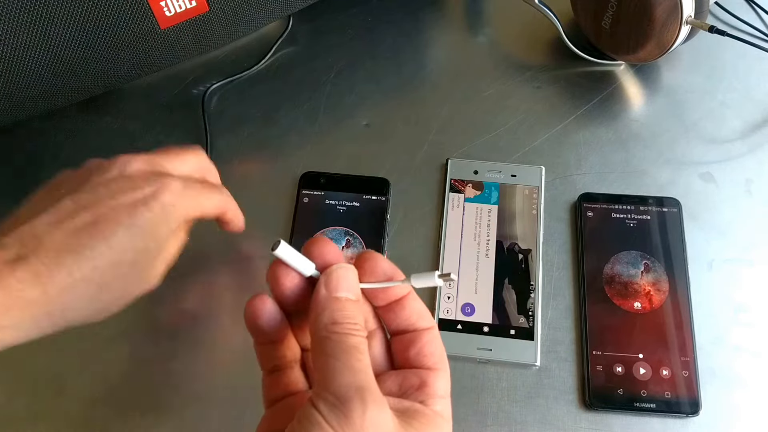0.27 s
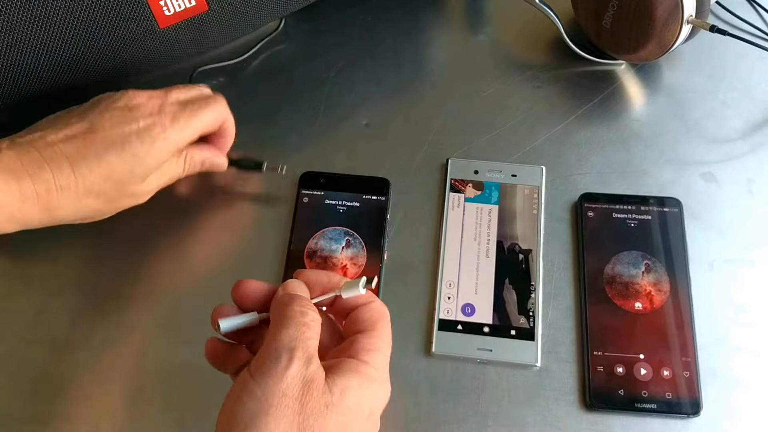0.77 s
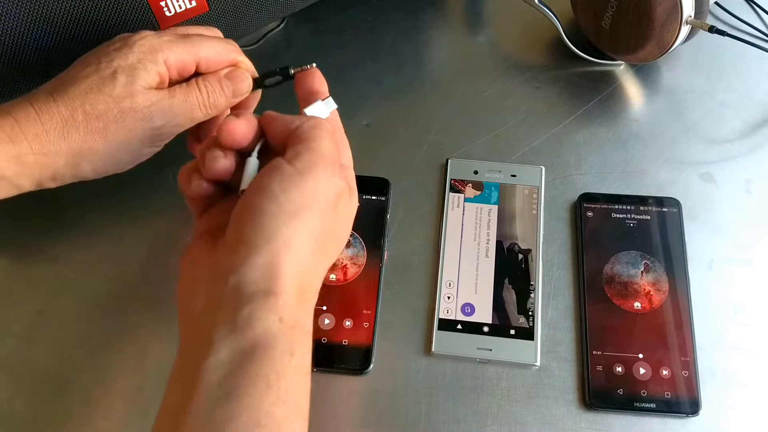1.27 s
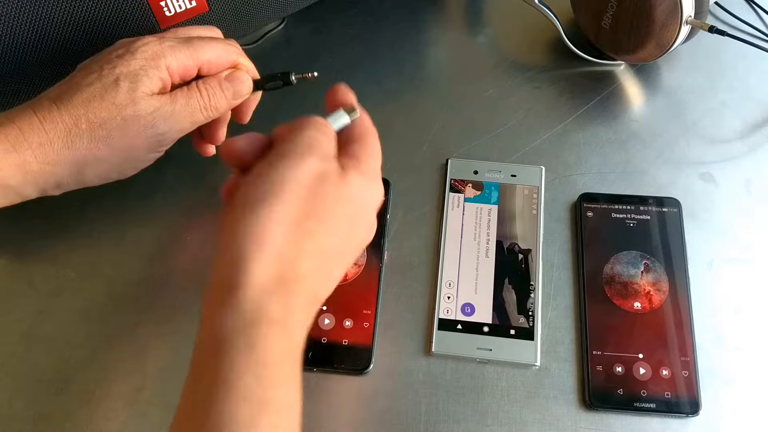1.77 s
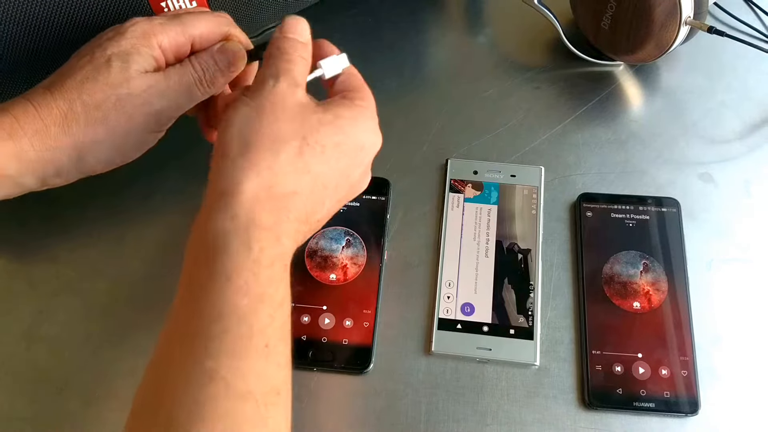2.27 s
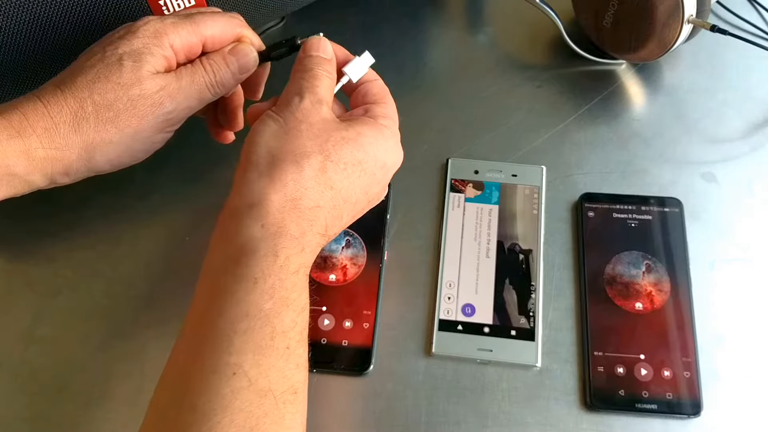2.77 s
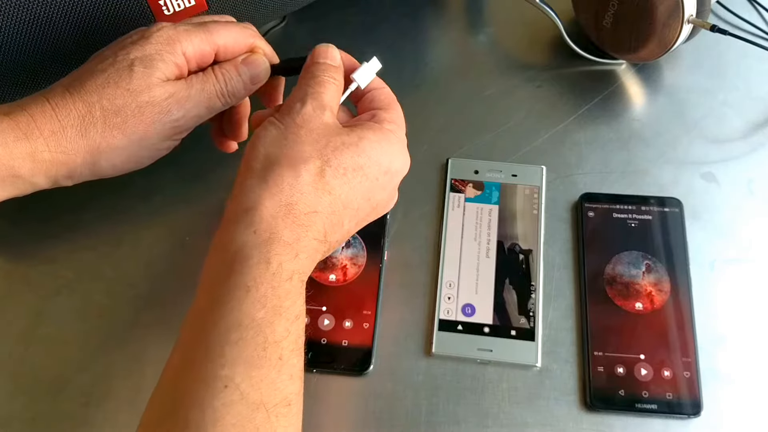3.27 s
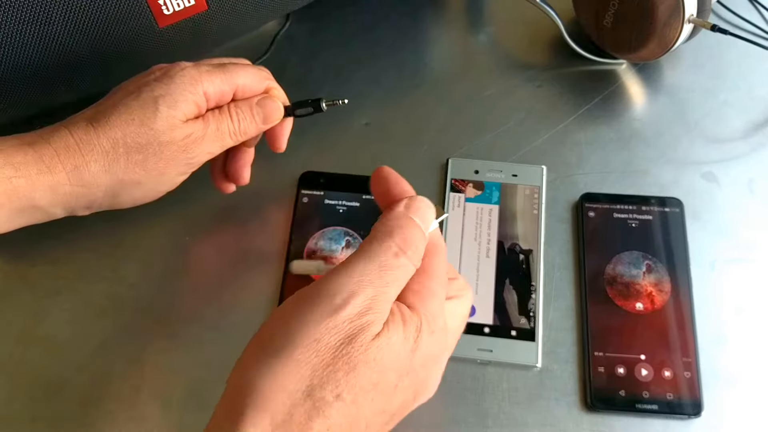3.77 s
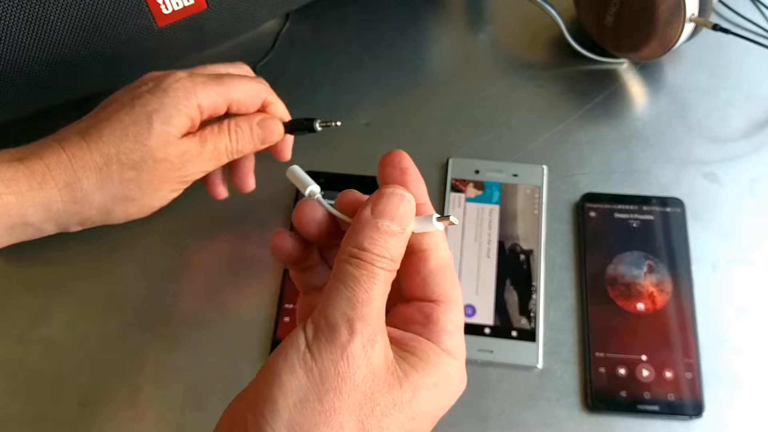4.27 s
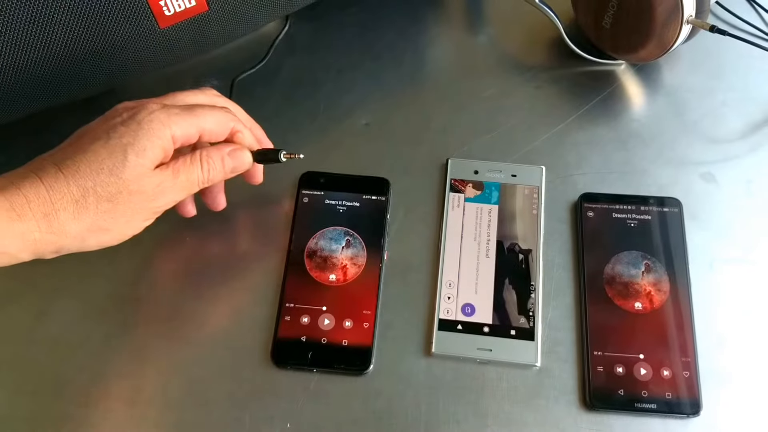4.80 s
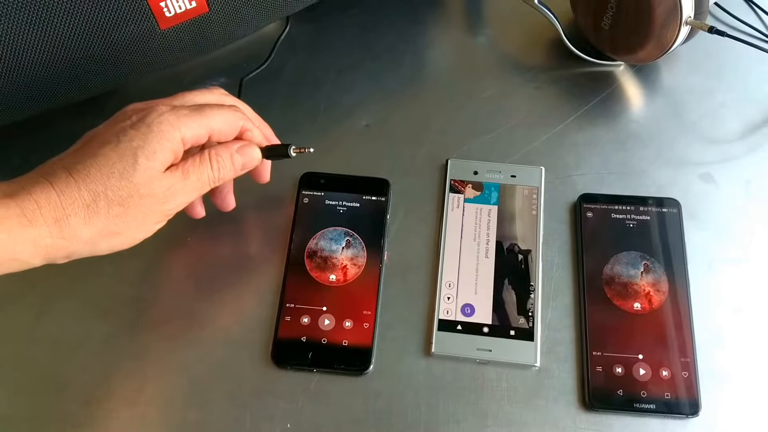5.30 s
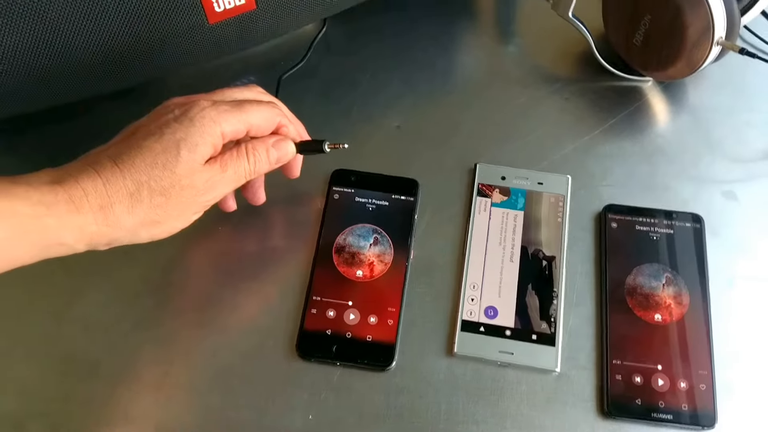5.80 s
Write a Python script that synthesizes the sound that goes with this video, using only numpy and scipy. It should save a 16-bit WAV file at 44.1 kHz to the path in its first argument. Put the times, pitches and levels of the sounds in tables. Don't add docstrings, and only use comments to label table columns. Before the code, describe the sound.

After a sharp unplugging snap and small table taps, five brief touches make a big speaker spit crackling mains buzz in a quiet room.

```python
import sys
import numpy as np
from scipy import signal
from scipy.fft import rfft, irfft
from scipy.io import wavfile

SR = 44100
rng = np.random.default_rng(int(sys.argv[2]) if len(sys.argv) > 2 else 0)


def invert_db(x):
    u = np.asarray(x, float) / 20
    return 10 ** u


def wav_out(sig):
    wavfile.write(sys.argv[1], SR, np.round(np.clip(np.atleast_2d(sig).T, -1, 1) * 32767).astype(np.int16))


N = 266540


def evened(x):
    return x / np.sqrt(np.mean(x ** 2) + 1e-20)


def read(points, hz, axis=1):
    table = np.transpose(points)
    return np.interp(np.log(hz + 1), np.log(table[0] + 1), table[axis])


def add(mix, s, sound):
    part = mix[..., round(s * SR):][..., :sound.shape[-1]]
    part += sound[..., :part.shape[-1]]


def resonate(x, hz, width):
    turn = np.exp(2j * np.pi * np.cumsum(hz * np.ones(len(x))) / SR)
    r = np.exp(-np.pi * width / SR)
    return 2 * (turn * signal.lfilter([1 - r], [1, -r], x / turn)).real


def resonate_twice(x, hz, width):
    return resonate(resonate(x, hz, width), hz, width)


def panned(x, pan_db):
    return x * invert_db([[pan_db / 2], [-pan_db / 2]])


def causal(points):
    gain = np.log(invert_db(read(points, abs(np.fft.fftfreq(4096, 1 / SR)))))
    taps = np.fft.ifft(np.exp(signal.hilbert(gain).conj())).real[:1500]
    return taps / np.linalg.norm(taps)


# (frequency [Hz], level per Hz [dB])
FLOOR_COLOUR = [(30, -37), (45, -9.5), (62, -1.5), (85, -13.5), (240, -18.5), (450, -25), (1200, -32),
                (2200, -38), (3800, -42), (7000, -46.5), (9000, -43), (12500, -38), (15300, -41.5),
                (16500, -63.5)]


def floor():
    floor_db = -56.5
    swell_s, swell_db = (.9, 3.4), (-2, 2.6)
    rest_s, rustle_db = (.5, .95), (7.1, .5)
    frames, hz = N // 512 + 5, np.fft.rfftfreq(2048, 1 / SR)
    a, b, c, d = rng.standard_normal((frames, 1025, 4)).T
    left, other = a + 1j * b, c + 1j * d
    same = np.clip(read(PORTS, hz, axis=3), 0, 1)[:, None]
    right = same * left + np.sqrt(1 - same ** 2) * other
    z = np.array([left, right]) * invert_db(read(FLOOR_COLOUR, hz))[:, None]
    t = np.arange(frames) * 512 / SR
    rumble = np.outer(hz < 260, np.interp(t, swell_s, swell_db))
    rustle_band = 1 / (1 + (110 / (hz + 1)) ** 4) / (1 + (hz / 1900) ** 4)
    z *= invert_db(rumble + np.outer(rustle_band, np.interp(t, rest_s, rustle_db)))
    noise = signal.istft(z, nperseg=2048, noverlap=1536)[1][:, :N]
    return invert_db(floor_db) * evened(noise)


# (time [s], level [dB])
SLIDE = [
    (0.0, -50),
    (0.058, -46),
    (0.062, -60),
]


def slide():
    out, (at, slide_db) = np.zeros((2, N)), np.transpose(SLIDE)
    t = np.arange(0, SNAP[0] + .001, 1 / SR)
    noise = np.diff(rng.standard_normal((2, len(t) + 1)))
    rub = np.array([resonate(n, 3900, 5800) for n in noise])
    add(out, 0, evened(rub) * invert_db(np.interp(t, at, slide_db) - 2.0))
    return out


# (time [s], peak level [dB], length [s])
SNAP = [(0.063, -3.5, 0.004)][0]
# (frequency [Hz], level per Hz [dB])
SNAP_COLOUR = [(47, -41), (80, -7.5), (346, -6.5), (2080, -20.5), (2840, -22.5), (3320, -27.5),
               (3620, -22.5), (4230, -26), (4940, -25), (11700, -23.5), (16000, -34.5)]


def snap():
    out, far, (s, db, length), colour = np.zeros((2, N)), np.zeros(N), SNAP, causal(SNAP_COLOUR)
    s = s + .001
    t = np.arange(600) / SR
    fall_db = -np.maximum(t - length, 0) * 11000 - 6.6 * (t > length)
    flutter = 0.71 + np.sin(np.pi * t / .0025) ** 2
    rattle = rng.standard_normal((2, 600)) * invert_db(fall_db) * flutter
    rattle = signal.fftconvolve(np.diff(rattle), colour[None], axes=1)
    rattle = rattle + 13.5 * np.array([resonate(n, 1280, 1140) for n in rattle])
    push = -np.sin(2 * np.pi * np.clip((t - .0006) / 0.00292, 0, 1)) * np.exp(-t / 0.0061)
    add(out, s, invert_db(db - 6.0) * panned(rattle / abs(rattle).max(), 2.9))
    add(out, s, invert_db(db - 8.5) * push)
    add(far, s, invert_db(db + 0.5) * (colour + 0.43 * resonate(colour, 240, 420)))
    return out, far


# (time [s], peak level [dB], centre [Hz], left-right [dB], time to fall by 60 dB [s])
KNOCKS = [
    (0.401, -37.5, 166, -1, 0.084),
    (0.648, -45.5, 328, 1, 0.029),
    (1.537, -60, 356, -4, 0.041),
    (4.959, -48, 129, -9, 0.17),
]
# (time [s], peak level [dB], left-right [dB])
CABLE = [(6650, 17000, 2, 0.02, 1)], [(.4015, -41.5, 9), (.4144, -43, -1)]
PLUG_TIP = [(1300, 1230, 1, 0.03, 0), (3000, 3000, -7.5, .012, 0)], [(.584, -56, -2), (.607, -40.5, 7)]
ADAPTER = ([(3800, 1900, -5, .014, -18), (1460, 1970, -6.5, 0.032, 6), (7370, 1300, -13.5, .012, 19),
           (2960, 760, -12.5, 0.027, -10)], [(4.9801, -31.5, 0.5), (4.9995, -34, -3), (5.0045, -37, 0)])
SHELL = [(4330, 1700, -1.5, 0.018, 0), (2890, 1100, -4.5, .012, -3)], [(5.1741, -40, -7)]
FINGERS = ([(960, 1300, -0.5, 0.028, 6), (2240, 1400, -8.5, 0.063, 1)], [(5.287, -49, 0), (5.399, -53, 1),
           (5.479, -57.5, 0), (5.557, -46, -8), (5.566, -50, -1)])


def ticks():
    knock_width_hz = 230
    out, far, t = np.zeros((2, N)), np.zeros(N), np.arange(3000) / SR
    rings = []
    for body, hits in (CABLE, PLUG_TIP, ADAPTER, SHELL, FINGERS):
        for s, db, pan_db in hits:
            for hz, width, ring_db, t60, lean_db in body:
                rings.append((s, db + ring_db, hz, pan_db + lean_db, width, t60))
    rings += [(s, db, hz, pan_db, knock_width_hz, t60) for s, db, hz, pan_db, t60 in KNOCKS]
    for s, db, hz, pan_db, width, t60 in rings:
        a, b = rng.standard_normal((2, 3000)) * invert_db(-60 * t / t60)
        pair = np.array([resonate_twice(n, hz, width) for n in (a, 1.12 * a + 0.47 * b)])
        pair = invert_db(db) * pair / abs(pair).max()
        add(out, s, panned(pair, pan_db))
        ring = resonate_twice(signal.unit_impulse(3000), hz, width)
        add(far, s, ring / np.linalg.norm(ring) * np.linalg.norm(pair[0]))
    return out, far


def whine():
    start_s, end_s, hz, db = 1.15, 1.53, 1100, -79.5
    out, size = np.zeros((2, N)), round((end_s - start_s) * SR)
    noise = rng.standard_normal((2, SR // 2))[:, :size]
    tone = np.array([resonate(n, hz, 64) for n in noise])
    add(out, start_s, evened(tone) * invert_db(db + 7.0) * signal.windows.tukey(tone.shape[1], .2))
    return out


# (frequency [Hz], width [Hz], level [dB])
WOOFER_BOX = [(106.2, 43, -2.5), (146, 23, -10), (191.4, 103, -5), (277.8, 154, 0.5), (381.4, 190, -8),
              (535, 81, -16.5)]
# (frequency [Hz], width [Hz], level [dB])
CONE = [(801, 76, -14.5), (1116, 160, -24), (1470, 177, -22)]


def woofer():
    push = np.r_[np.hanning(24), np.zeros(1976)]
    box = sum(invert_db(db) * resonate_twice(push, hz, width) for hz, width, db in WOOFER_BOX)
    cone = sum(invert_db(db) * resonate_twice(push, hz, width) for hz, width, db in CONE)
    box = signal.sosfilt(signal.butter(4, 600, fs=SR, output="sos"), np.roll(box, 40))
    return (box + cone) / np.linalg.norm(box)


# (frequency [Hz], level [dB])
TWEETER_COLOUR = [(400, -9.5), (900, 4), (1500, 0), (2600, -6), (3800, -2.5), (6000, -8.5), (7500, -7.5),
                  (8800, -10), (10400, -4), (12500, -6.5), (14000, -13.5), (16500, -21.5)]


def tweeter():
    return causal(TWEETER_COLOUR)


# (time [s], peak level [dB], thud level [dB], middle level [dB], left-right [dB])
SPARKS = [
    (1.6712, -54, 11.5, -9, 3),
    (2.3122, -7, -16, -49, -2),
    (2.6493, -6.5, -5, -0.5, 2.5),
    (2.9477, -35, 12, 8.5, 2),
    (3.1823, -19, -22.5, -26, 4.5),
]


def sparks():
    out, far, high, low = np.zeros((2, N)), np.zeros(N), tweeter(), woofer()
    middle, presence = resonate(high, 2100, 1400), resonate(high, 4400, 1800)
    top = resonate_twice(high, 9000, 7500)
    middle, presence, top = (band / abs(band).max() for band in (middle, presence, top))
    for s, db, low_db, middle_db, pan_db in SPARKS:
        presence_db = max(middle_db - 4.5, -14)
        colour = top + invert_db(middle_db) * middle + invert_db(presence_db) * presence
        burst = 0.39 * rng.standard_normal((2, 400)) * np.exp(-np.arange(400) / SR / 0.00061)
        burst[0, [0, 12, 25]] = -1, -.7, -.45
        burst[1, [8, 23]] = -1, -.6
        burst = burst + np.array([[.2], [.5]]) * np.roll(burst, round(.003 * SR), axis=1)
        crack = invert_db(db + 0.5) * signal.fftconvolve(burst, colour[None], axes=1)
        thud = invert_db(db + low_db) * low / abs(low).max()
        add(out, s + 0.00014, panned(crack, pan_db))
        add(out, s - .0005, thud)
        add(far, s, invert_db(db - 1.0) * colour + thud[:1500])
    return out, far


# (time [s], contact level [dB])
TOUCHES = [
    [(1.672, -55.5), (1.69, -35.5), (1.724, -34), (1.737, -47)],
    [(2.318, -22.5), (2.326, -28), (2.35, -29), (2.42, -37), (2.498, -27), (2.505, -41.5)],
    [(2.658, -34.5), (2.672, -37.5), (2.698, -29.5), (2.746, -39.5), (2.77, -29), (2.79, -32), (2.797, -36)],
    [(2.955, -36.5), (2.975, -27.5), (3.01, -30), (3.05, -41), (3.073, -23.5), (3.096, -29.5),
     (3.113, -56.5)],
    [(3.186, -31.5), (3.194, -31), (3.238, -44.5), (3.284, -30.5), (3.338, -38), (3.345, -43)],
]
# (hiss over the contact [dB], hum level [dB], first share of the opposite thump [0-1])
SKIN = [(-22, -26.5, 0.7), (-24, -25, 0.4), (-19, -22, 0.1), (-21.5, -23.5, 0.8), (-30, -27.5, 0.66)]
# (time [s], pick-up level [dB])
PICKUP = [
    (1.8, -59),
    (1.9, -60),
    (2.27, -57),
    (2.31, -51.5),
    (3.36, -61.5),
    (3.6, -64),
    (3.85, -62),
    (4.3, -67.5),
    (6.04, -67.5),
]


def controls():
    pickup_hiss_db, pickup_hum_db, pickup_share, pickup_follows = -82.5, -50.5, 0.05, 0.307
    firm_db, hiss_follows, hum_follows = -35.5, 0.71, -0.15
    fizz_db, fizz_s = 5.5, 0.013
    hum_start_db, hum_rise_s = -8, .03
    even_s, even_rest = 0.011, 0.041
    tear_db, tear_lead_s, tear_s = 5.5, .012, 0.0122
    t, (s, near_db) = np.arange(N) / SR, np.transpose(PICKUP)
    near_db, live = np.interp(t, s, near_db), t > s[0]
    rest_db = pickup_follows * (near_db - near_db[-1])
    hiss, hum = invert_db(pickup_hiss_db + rest_db), invert_db(pickup_hum_db + rest_db)
    out = live * np.array([invert_db(near_db), hiss, hum, 0 * t + pickup_share])
    for rows, (hiss_db, hum_db, share), spark in zip(TOUCHES, SKIN, SPARKS):
        s, contact_db = np.transpose(rows)
        since = np.arange(0, s[-1] - spark[0], 1 / SR)
        left_s = since[::-1]
        contact_db = np.interp(since + spark[0], s, contact_db)
        over_db = contact_db - firm_db
        fizz = fizz_db * np.exp(-since / fizz_s)
        tear = tear_db * np.exp(-((left_s - tear_lead_s) / tear_s) ** 2)
        hiss = invert_db(firm_db + hiss_db + hiss_follows * over_db + fizz + tear)
        hiss = hiss * np.minimum(left_s / tear_lead_s, 1)
        hum = invert_db(hum_db + hum_follows * over_db + hum_start_db * np.exp(-since / hum_rise_s))
        opposite = even_rest - pickup_share + share * np.exp(-since / even_s)
        add(out, spark[0], np.array([invert_db(contact_db), hiss, hum, opposite]))
    return out


# (frequency [Hz], width [Hz])
BOOM = (53.2, 4.2)
# (frequency [Hz], width [Hz], level [dB])
OVERTONES = [(86.6, 25.7, -4), (142.4, 44, -6.5)]


def buzz():
    mains_hz, first_thump_s = 50.04, .0134
    thump, hiss, hum, share = controls()
    halves = 2 * mains_hz * (np.arange(N) / SR - first_thump_s) + 2
    count = halves.astype(int)
    grip = invert_db([1.1, 2.5] * rng.standard_normal((count[-1] + 2, 2)))
    sign = np.where(count % 2, -np.clip(share, 0, 1), 1)
    kicks = np.diff(count, prepend=count[0]) * sign * grip[count, 0] * np.sqrt(SR / mains_hz)
    kicks = np.roll(kicks, -round(.0025 * SR))
    low = signal.oaconvolve(kicks * thump, woofer())[:N]
    phase = (halves + .28) % 1
    gate = .15 + np.exp(-phase / .1) + (phase > .2) * np.exp(-(phase - .2) / .12)
    grit = rng.standard_normal((2, N)) * invert_db(1.67 * rng.exponential(1, (2, N)))
    arcs = evened(grit) * evened(gate) * grip[count, 1] * hiss * invert_db(5.0)
    high = signal.oaconvolve(arcs + .5 * arcs[::-1], tweeter()[None], axes=1)[:, :N]
    mains = np.sqrt(2) * np.cos(np.pi * (halves - .97))
    squashed = hum * evened(np.maximum(mains, .6) - .8)
    boom = resonate(hum * mains, *BOOM)
    boom = boom + sum(invert_db(db) * resonate_twice(squashed, hz, width) for hz, width, db in OVERTONES)
    return low, high, boom


# (frequency [Hz], width [Hz])
TABLE_DIPS = [(655, 110), (985, 130)]


def dipped(x):
    for hz, width in TABLE_DIPS:
        x = signal.lfilter(*signal.iirnotch(hz, hz / width, fs=SR), x)
    return x


# (frequency [Hz], time to fall by 60 dB [s])
ROOM = [(60, 0.49), (160, 0.61), (420, 0.64), (1100, 0.7), (2910, 0.7), (7680, 0.5), (13000, 0.29)]


def room(x):
    taps = rng.standard_normal((2, SR))
    hz, t, z = signal.stft(taps, SR, nperseg=512)
    same = np.clip(read(PORTS, hz, axis=3) * 1.1, 0, 1)[:, None]
    z[1] = same * z[0] + np.sqrt(1 - same ** 2) * z[1]
    tail = signal.istft(z * invert_db(-60 * t / read(ROOM, hz)[:, None]), SR, nperseg=512)[1]
    tail = tail * np.clip((np.arange(tail.shape[1]) - 220) / 350, 0, 1)
    return signal.fftconvolve(x[None], tail / np.linalg.norm(tail[0]), axes=1)[:, :N]


# (frequency [Hz], left-right [dB], left lead [rad], likeness of the quiet-room noise [0-1])
PORTS = [(50, -9, 1.32, 1), (97.2, -7.5, 0.016, 0.7), (153.6, -2.5, 1.3, 0.92), (280, 2.5, 0.75, 0.89),
         (530, -2.5, 0.51, 0.28), (830, 3, 1.18, 0.6), (1830, -2, 0.85, 0), (15000, 1.5, 0.61, 0)]


def ports(pair):
    hz = np.fft.rfftfreq(N, 1 / SR)
    half = invert_db(read(PORTS, hz) / 2) * np.exp(.5j * read(PORTS, hz, axis=2))
    return irfft(rfft(pair) * np.array([half, 1 / half]), N)


def scene():
    low, high, boom = buzz()
    spark, spark_far = sparks()
    plug, plug_far = snap()
    rub = slide()
    small, small_far = ticks()
    far = invert_db(-6.0) * high.mean(0) + invert_db(-11) * low + invert_db(-4.5) * spark_far
    far = far + plug_far + invert_db(-5.5) * small_far
    speaker = dipped(low + high + spark) + boom
    return ports(speaker + plug + rub + small + room(far) + whine() + floor())


def top_cut(x):
    return signal.sosfilt(signal.butter(12, 16830, fs=SR, output="sos"), x)


def record(dry):
    cut = signal.sosfilt(signal.butter(4, 38, "high", fs=SR, output="sos"), dry)
    cut = signal.sosfilt(signal.butter(10, 16000, fs=SR, output="sos"), cut)
    rounded = .9 * np.tanh(cut / .9)
    return top_cut(rounded + 0.00085)


dry = scene()
out = record(dry)
wav_out(out)
```